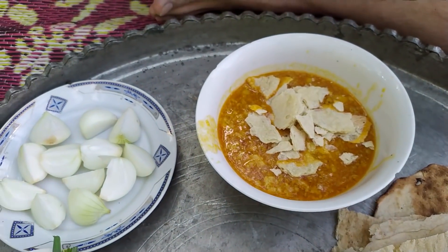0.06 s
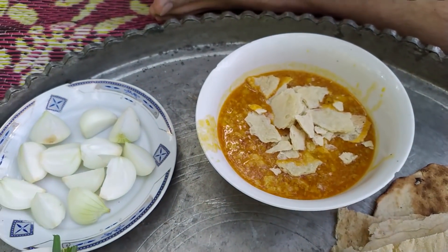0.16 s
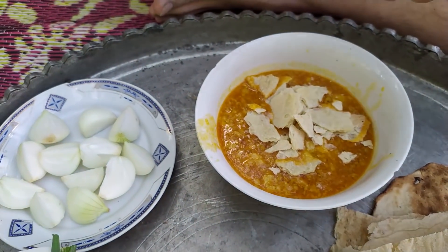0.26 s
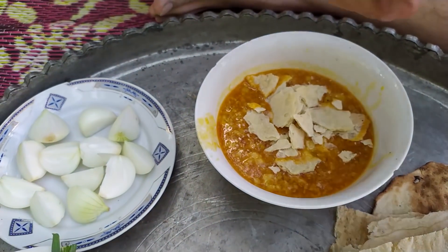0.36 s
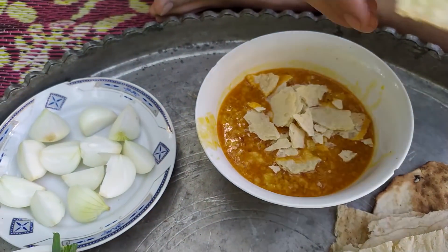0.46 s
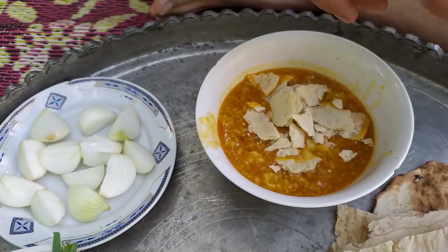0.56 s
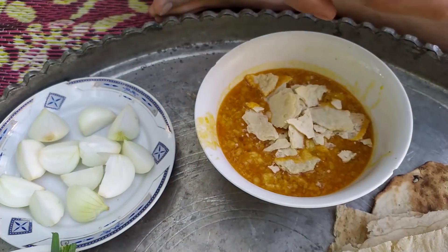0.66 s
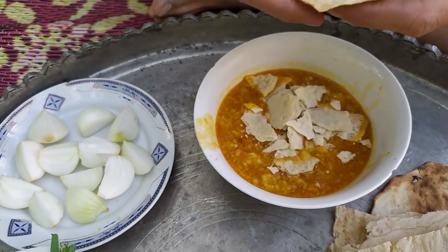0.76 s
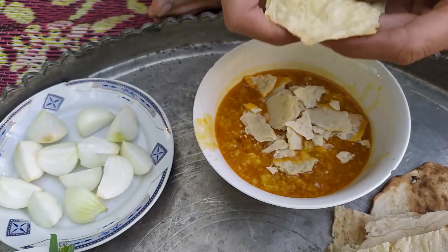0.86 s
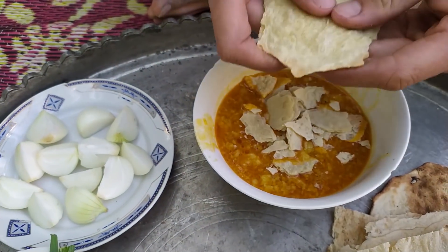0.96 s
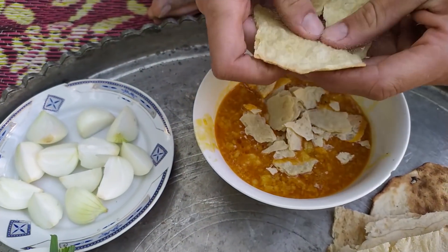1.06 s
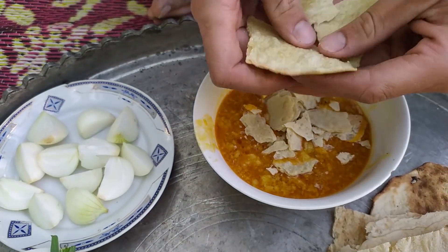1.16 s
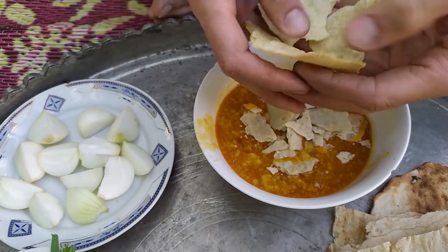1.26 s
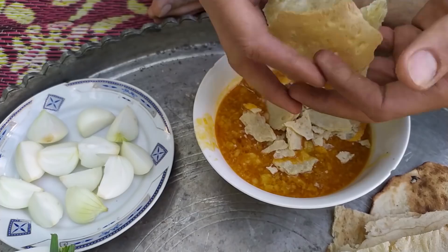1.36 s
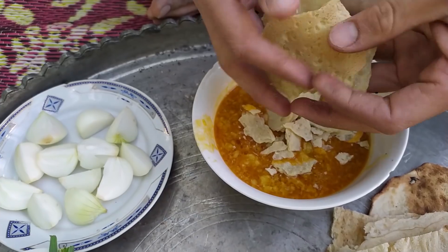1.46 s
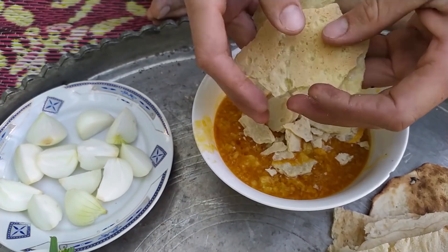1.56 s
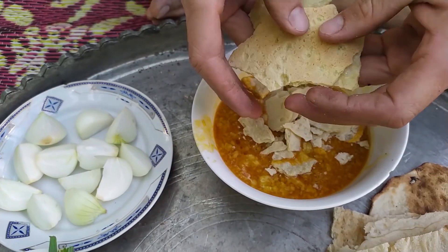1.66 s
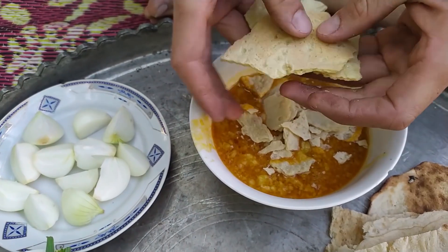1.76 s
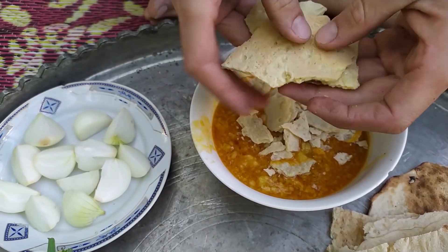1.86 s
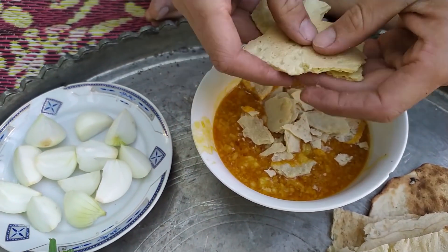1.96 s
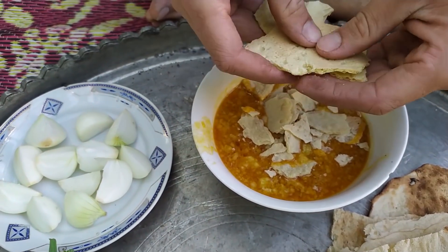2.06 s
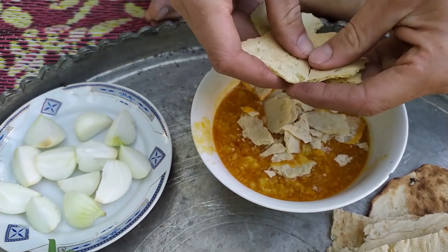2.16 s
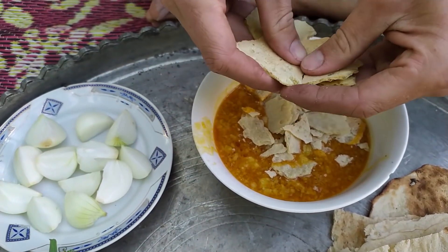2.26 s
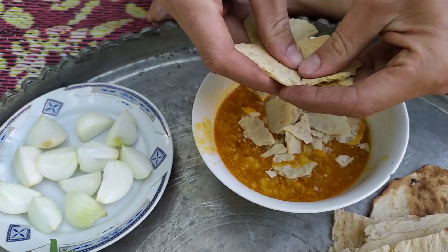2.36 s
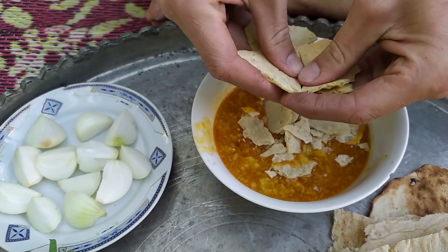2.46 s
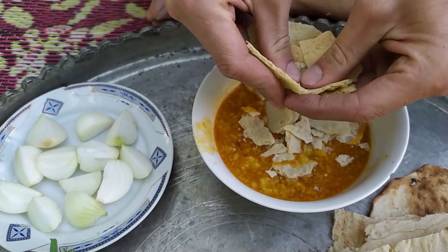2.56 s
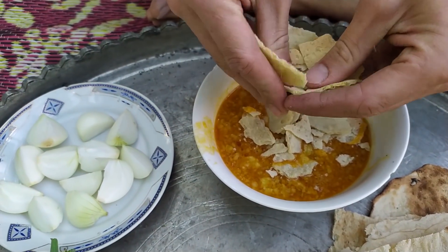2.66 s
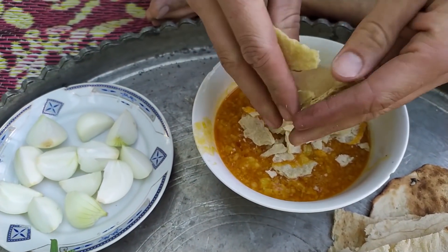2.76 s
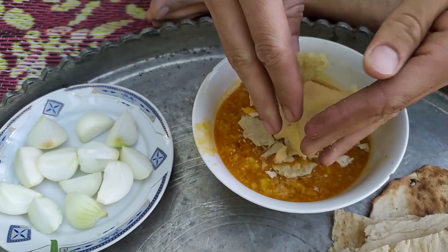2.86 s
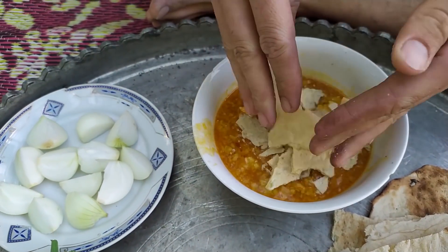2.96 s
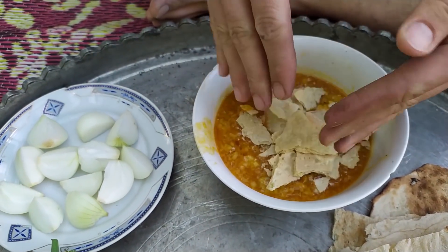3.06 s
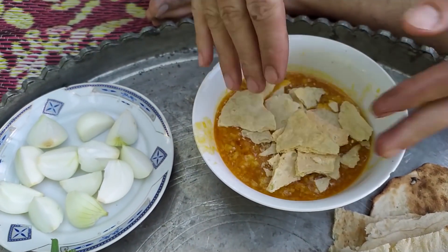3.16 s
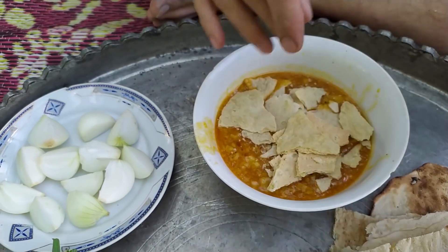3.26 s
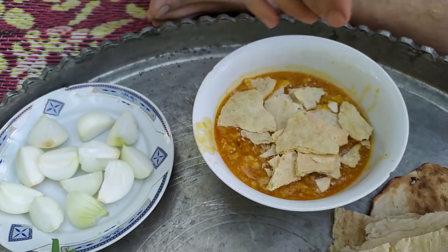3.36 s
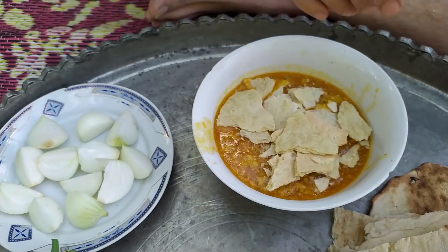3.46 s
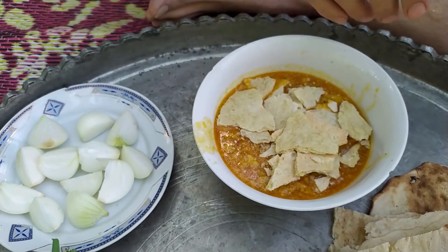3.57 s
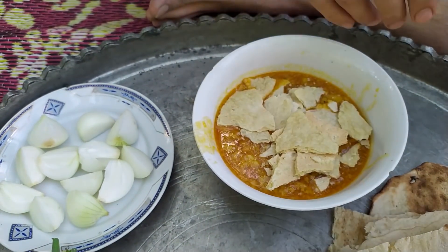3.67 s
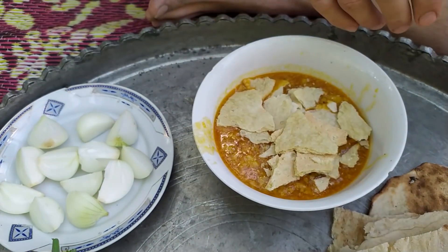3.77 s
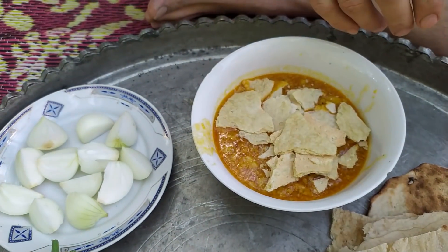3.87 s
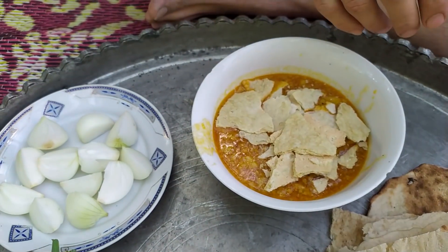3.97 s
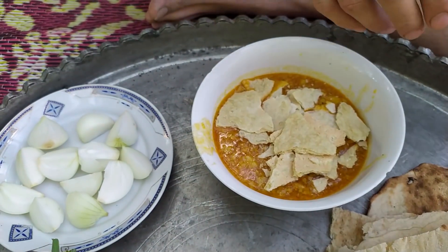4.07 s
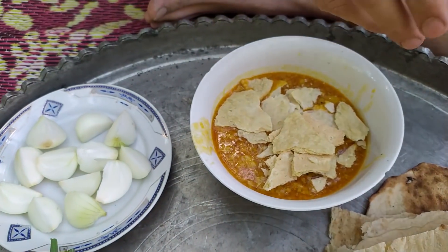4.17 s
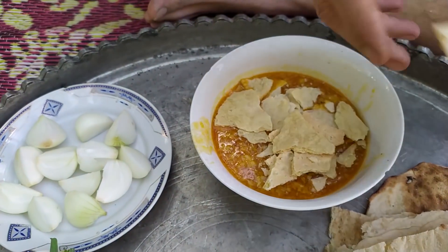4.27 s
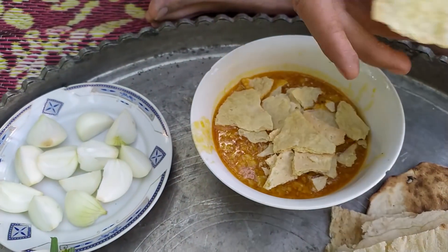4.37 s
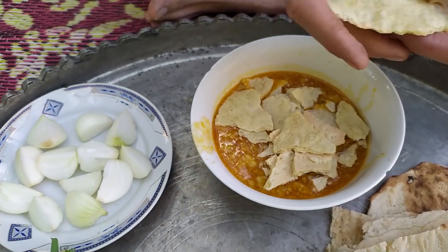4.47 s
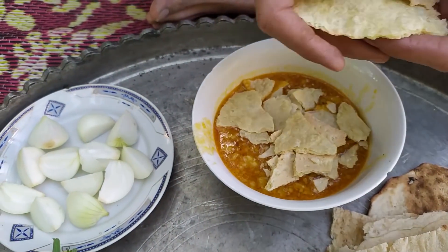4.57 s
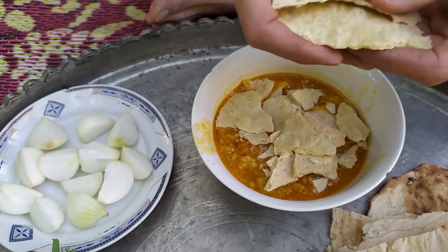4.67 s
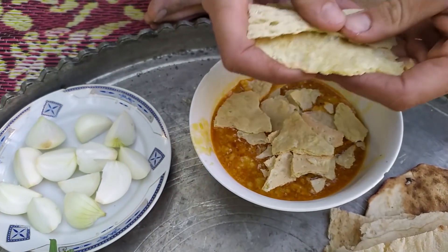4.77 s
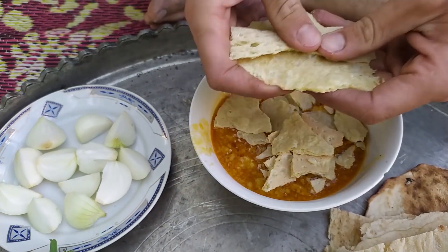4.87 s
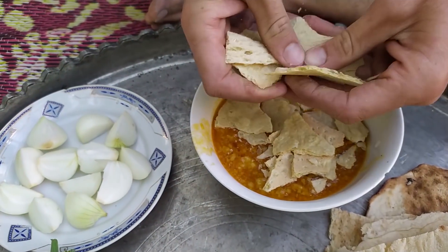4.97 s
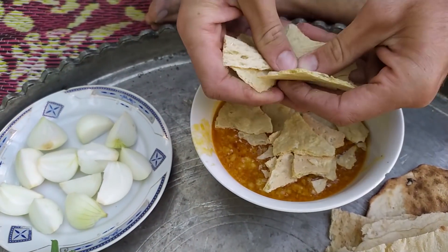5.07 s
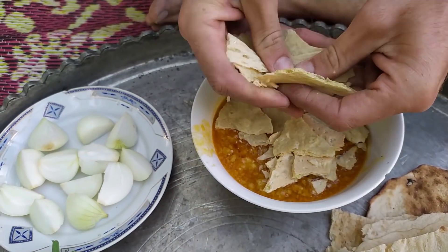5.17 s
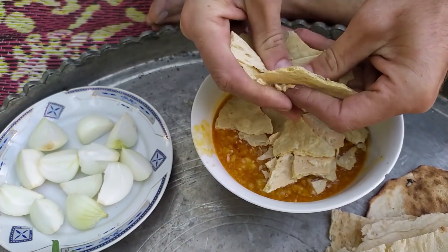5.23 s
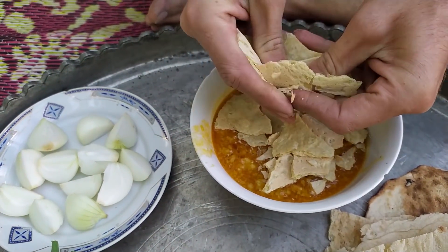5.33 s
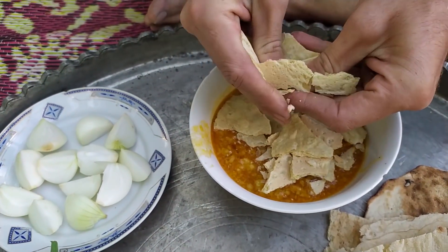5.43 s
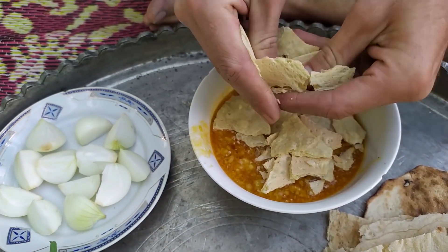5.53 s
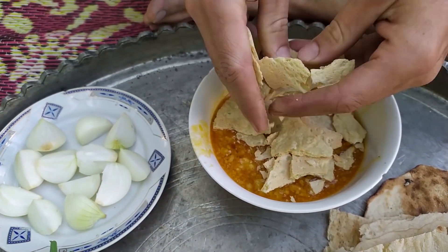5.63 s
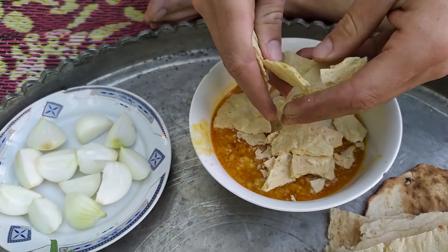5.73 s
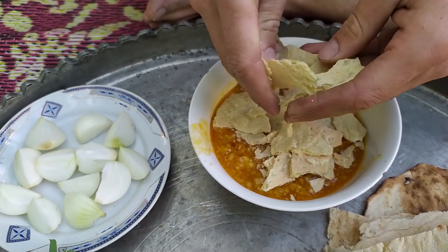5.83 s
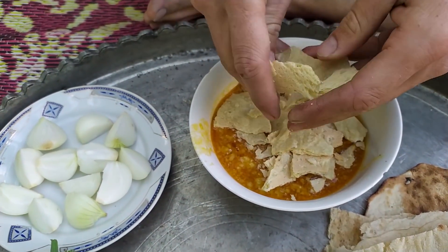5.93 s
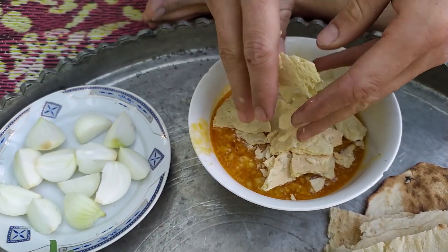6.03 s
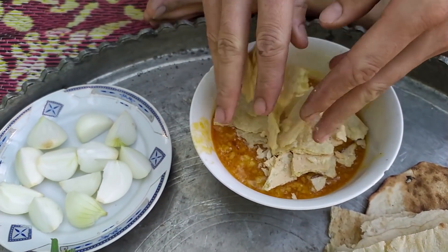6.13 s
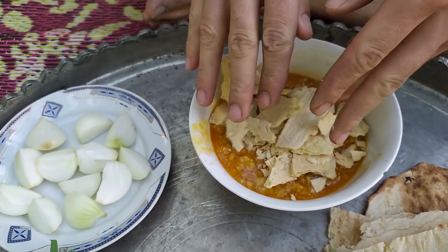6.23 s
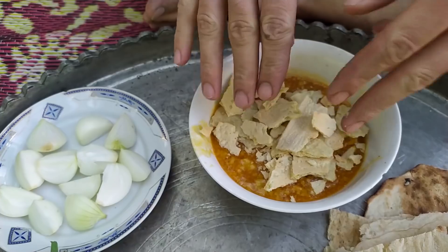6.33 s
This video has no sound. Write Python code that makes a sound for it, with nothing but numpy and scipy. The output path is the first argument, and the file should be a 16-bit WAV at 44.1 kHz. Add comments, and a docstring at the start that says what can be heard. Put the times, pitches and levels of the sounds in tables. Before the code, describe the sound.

Brittle flatbread cracks sharply between fingers, crumbs crackling, then pieces drop dully into a china bowl in a quiet room.

```python
"""Tearing dry flatbread into a bowl

Two hands fold and tear dry flatbread close by; the crust fails in snaps and running cracks, noise bursts that ring as flakes.
Running cracks shed crumbs; flakes crackle under the fingers and skin brushes, as grains of noise over a friction bed.
Pieces pat dully in one broad resonance, and touches ring the decaying modes of a filled china bowl.
The left microphone port stresses the treble, the loudest cracks saturate, and the quiet room adds a low rush and hiss."""
import sys
import numpy as np
from scipy import signal
from scipy.fft import rfft, irfft, next_fast_len
from scipy.io import wavfile
from scipy.ndimage import uniform_filter1d, map_coordinates

SR = 44100
rng = np.random.default_rng(int(sys.argv[2]) if len(sys.argv) > 2 else 0)


def generate_wav(sig):
    """Save sig (samples, or channels by samples) to the path in sys.argv[1] as 16-bit PCM at SR."""
    pcm = np.round(np.clip(np.atleast_2d(sig).T, -1, 1) * 32767).astype(np.int16)
    wavfile.write(sys.argv[1], SR, pcm)


N = 282240

# Cracks that run through the sheet. Each row: start in seconds, length of the run in seconds, level in dB,
# pitch of the flake in Hz, low flex of the sheet in dB re the level.
RUNNING_CRACKS = [(1.0793, 0.0026, -11.5, 4440, -11), (1.525, 0.01, -39, 4270, -8),
                  (1.545, 0.014, -36.5, 4330, -14.5), (1.603, 0.008, -30.5, 5930, -14.5),
                  (2.148, 0.0019, -18.5, 4500, -13.5), (2.155, 0.0033, -13.5, 4500, -22.5),
                  (2.2, 0.0053, -20, 5060, -22), (2.292, 0.0063, -24.5, 4340, -23),
                  (2.4115, 0.0066, -12, 5000, -23), (2.456, 0.0068, -20.5, 5200, -39),
                  (2.554, 0.027, -14, 5340, -23.5), (2.578, 0.011, -12.5, 4600, -20.5),
                  (4.772, 0.0071, -19, 5370, -18.5), (4.9883, 0.00047, -19.5, 4060, -7.5),
                  (5.001, 0.0086, -10, 5250, -16.5), (5.021, 0.0085, -15, 4230, -17),
                  (5.174, 0.0063, -25, 5300, -30), (5.197, 0.003, -23, 5170, -24),
                  (5.2095, 0.0044, -16, 5140, -26), (5.2547, 0.0055, -12.5, 4980, -20),
                  (5.271, 0.012, -16, 5500, -23), (5.58, 0.016, -33.5, 5450, -23),
                  (5.654, 0.011, -36.5, 5450, -14.5), (5.909, 0.0033, -12, 4700, -16.5),
                  (5.929, 0.018, -28, 5630, -33)]
LEVEL_WINDOW_S = 0.014  # the energy of a fracture's crisp part, spread over this long, gives its level


def amp(db):
    """Level law: decibels to an amplitude gain."""
    return 10 ** (np.asarray(db) / 20)


def unit(x):
    """Normalisation of mean power: scale to rms 1."""
    return x / np.sqrt(np.mean(x ** 2) + 1e-20)


def along(points, hz):
    """Logarithmic frequency scale: (Hz, value) points joined by straight lines on a log axis."""
    point_hz, values = np.transpose(points)
    return np.interp(np.log(hz + 1), np.log(point_hz), values)


def curve(rows):
    """Linear interpolation in time: (seconds, value) rows as one value per sample."""
    return np.interp(np.arange(N) / SR, *np.transpose(rows))


def colour(x, gain):
    """Minimum-phase filtering: folding the cepstrum makes a gain over frequency causal."""
    n = x.shape[-1]
    half = next_fast_len(n)
    hz = np.fft.rfftfreq(2 * half, 1 / SR)
    cepstrum = irfft(np.log(np.maximum(gain(hz), 1e-6)))
    cepstrum[1:half] *= 2
    cepstrum[half + 1:] = 0
    response = np.exp(rfft(cepstrum))
    return irfft(rfft(x, 2 * half) * response)[..., :n]


def shaped(x, spectrum):
    """Spectral shaping: x filtered by a table of Hz and dB, at rms 1."""
    return unit(colour(x, lambda hz: amp(along(spectrum, hz))))


def pair(x, apart):
    """Partial coherence: left and right mix a shared row with a row of their own."""
    own_share = np.clip(apart, 0, 1)
    return np.sqrt(1 - own_share) * x[0] + np.sqrt(own_share) * x[1:]


def add(track, s, sound):
    """Superposition: mix a sound into the track at a time in seconds."""
    part = track[:, max(0, round(s * SR)):][:, :sound.shape[-1]]
    part += sound[..., :part.shape[-1]]


def background():
    """Diffuse noise: a low rush nearly alike in both ports, and hiss independent in each port."""
    # Spectra of the rush and the hiss. Each row: frequency in Hz, relative density in dB per Hz.
    rush_spectrum = [(15, -85), (25, -46), (45, -11), (65, -5.5), (110, -2.5), (170, -1), (270, -3),
                     (400, -3), (650, -12), (1400, -31.5), (4000, -64)]
    hiss_spectrum = [(200, -19.5), (800, -4.5), (1500, -6), (2200, -4), (3000, -0.5), (5200, -2.5),
                     (7500, -2.5), (10000, -5.5), (13000, -14), (16000, -23)]
    rush = shaped(pair(rng.standard_normal((3, N)), apart=0.12), rush_spectrum)
    hiss = shaped(rng.standard_normal((2, N)), hiss_spectrum)
    return amp(-54) * rush + amp(-48.0) * hiss


def room(x):
    """Reverberation: convolution with noise whose decay time varies with frequency, shortest near 3 kHz."""
    # Decay of the room. Each row: frequency in Hz, time to fall by 60 dB in seconds.
    decay_times = [(200, 0.14), (3000, 0.1), (14000, 0.22)]
    hz, t, bins = signal.stft(rng.standard_normal((2, SR // 3)), SR, nperseg=256)
    decay = amp(-60 * t / along(decay_times, hz)[:, None])
    tail = signal.istft(bins * decay, SR, nperseg=256)[1]
    return signal.fftconvolve(x, tail / np.linalg.norm(tail[0]), axes=1)[:, :N]


def bowl():
    """Modal ringing: each light touch starts the damped modes of the filled china bowl."""
    # Light touches on the bowl. Each row: start in seconds, level in dB.
    touches = [(2.958, -57), (3.19, -52), (5.977, -43), (6.24, -45), (6.313, -44.5)]
    # Modes of the filled bowl. Each row: frequency in Hz, level in dB re the touch, 60 dB decay in seconds.
    modes = [(872, -8.5, 0.28), (1960, -1.5, 0.14), (3400, -3, 0.11), (5100, 17, 0.019)]
    out = np.zeros((2, N))
    t = np.arange(SR // 2) / SR
    for s, db in touches:
        ringing = np.zeros(len(t))
        for hz, level, t60 in modes:
            start_db = db + level + rng.normal(0, 3.1)  # each touch excites the modes unevenly
            ringing += amp(start_db - 60 * t / t60) * np.sin(2 * np.pi * hz * t)
        add(out, s, ringing)
    return out


def pats():
    """Resonance: soft contacts of loose pieces, as decaying noise, drive one broad, short resonance."""
    # Soft contacts. Each row: start in seconds, strength of the push in dB.
    contacts = [(1.206, -26), (1.334, -27), (1.455, -25), (2.801, -26), (2.93, -12.5), (2.939, -23),
                (2.955, -11), (3.005, -18), (3.034, -21)]
    resonance_hz, width_hz, fall_s = 1690, 260, 0.0044  # fall: time for the push to drop to 1/e
    t = np.arange(N) / SR
    push = sum(amp(db) * (t > s) * np.exp(-np.abs(t - s) / fall_s) for s, db in contacts)
    piece = lambda hz: 1 / np.hypot(1, (hz - resonance_hz ** 2 / (hz + 1)) / width_hz)
    return colour(push * pair(rng.standard_normal((3, N)), apart=0.19), piece)


def grains(rate, spread_db, life, bed_db, size=256):
    """Shot noise: decaying grains of uneven size at random moments, over a smooth friction noise."""
    happens = rng.random(N) < rate / SR  # rate in grains per second
    sizes = amp(spread_db * np.minimum(rng.exponential(size=N), 3)) * happens
    decay = np.exp(-2 * np.arange(size) / SR / life)  # of power; life is the 1/e time of amplitude
    power = signal.fftconvolve(sizes ** 2, decay)[:N]
    swell = np.sqrt(np.abs(power / power.mean()) + amp(bed_db) ** 2)  # bed in dB re the mean grains
    return swell * pair(rng.standard_normal((3, N)), apart=0.49)


def strokes(rows, attack_s, sag_db_per_s, release_s):
    """Friction envelope: the power of strokes that take hold, ease off while sliding, and let go."""
    power = np.zeros(N)
    for s, length, db in rows:
        t = np.maximum(np.arange(N) / SR - s, 0)
        held = amp(db - sag_db_per_s * np.minimum(t, length))
        attack = np.minimum(t / attack_s, 1)
        release = np.exp(-np.maximum(t - length, 0) / release_s)
        power += (held * attack * release) ** 2
    return power


def crumbs():
    """Exponential decay: the power of crumbs after each running crack, more from a longer run."""
    # level re the crack, for a run as long as the level window; time for the amplitude to drop to 1/e
    crumb_db, fall_s = -16, 0.018
    power = np.zeros(N)
    for s, run, db, _, _ in RUNNING_CRACKS:
        t = np.arange(N) / SR - s - run
        fall = amp(db + crumb_db) * np.exp(-np.abs(t) / fall_s)
        power += (t > 0) * run / LEVEL_WINDOW_S * fall ** 2
    return power


def catching():
    """Stick-slip: the uneven gain of fingers that catch and slip on the crust."""
    catches_per_s, catch_db = 90, 1.5
    knots = rng.standard_normal(N // 100)
    positions = np.arange(N) * catches_per_s / SR
    swing = map_coordinates(knots, [positions], mode="mirror")  # smooth curve through the knots
    return unit(amp(catch_db * swing))


def handling():
    """Granular friction: dry flakes crackle under fingers and after running cracks; skin brushes dully."""
    # Spectra of crackling flakes and of bare skin. Each row: frequency in Hz, relative density in dB per Hz.
    flake_spectrum = [(150, -19), (600, -15), (1100, -6), (1800, -3.5), (2400, 1), (3400, 4.5), (4700, 4),
                      (6800, 0.5), (9500, 1.5), (12500, -10.5), (16000, -16)]
    skin_spectrum = [(100, -10.5), (400, 0), (900, -0.5), (1600, -0.5), (3000, 4), (4500, -6), (7000, -4.5),
                     (11000, -10.5), (16000, -29)]
    # Fingers slide over the crust or press pieces into the bowl.
    # Each row: start in seconds, length in seconds, level in dB.
    rubs = [(1.21, 0.055, -44), (1.44, 0.024, -44.5), (1.645, 0.04, -45), (1.82, 0.017, -36),
            (1.945, 0.049, -37), (2.28, 0.037, -37), (2.48, 0.07, -40), (2.69, 0.24, -45),
            (2.808, 0.011, -37), (2.87, 0.016, -41), (2.93, 0.13, -37.5), (3.025, 0.035, -32),
            (3.08, 0.15, -50), (4.453, 0.025, -30), (4.475, 0.042, -36.5), (4.83, 0.09, -47.5),
            (5.34, 0.12, -42.5), (5.67, 0.23, -45.5), (6.02, 0.17, -44.5), (6.18, 0.19, -41),
            (6.238, 0.037, -29.5)]
    # Bare skin brushes about. Each row: start in seconds, length in seconds, level in dB.
    brushes = [(-0.005, 0.024, -32.5), (0.055, 0.035, -36), (0.11, 0.018, -32.5), (0.15, 0.06, -50),
               (0.3, 0.0073, -46), (1.31, 0.11, -50), (3.8, 0.03, -44.5), (3.828, 0.051, -40.5),
               (3.88, 0.028, -38.5), (3.96, 0.021, -44.5)]
    flakes = shaped(grains(rate=980, spread_db=5.0, life=0.0015, bed_db=-4), flake_spectrum)
    skin = shaped(grains(rate=750, spread_db=3, life=.0008, bed_db=0), skin_spectrum)
    rub_power = strokes(rubs, attack_s=0.0045, sag_db_per_s=7, release_s=0.016)
    rubbing = np.sqrt(rub_power + crumbs())
    brushing = np.sqrt(strokes(brushes, attack_s=0.0032, sag_db_per_s=13, release_s=0.021))
    return rubbing * catching() * flakes + brushing * skin


def ticks():
    """Random microfracture: faint snaps of the bent sheet, as rows of start s, level dB, pitch Hz."""
    # Stretches of hard bending, each giving at least one tick. Each row: start in seconds, end in seconds;
    # an end ahead of its start leaves a single tick near the start.
    bends = [(1.93, 2.37), (2.381, 2.69), (2.92, 3.06), (5.171, 5.47), (6.221, 4.8)]
    ticks_per_s, tick_db, spread_db = 24, -33.5, 1.5
    tick_hz, spread_octaves = 4740, 0.3
    moments = []
    for start, end in bends:
        count = max(1, round((end - start) * ticks_per_s))
        moments.extend(np.linspace(start, end, count, endpoint=False))
    delay, size, pitch = rng.standard_normal((len(moments), 3)).T
    starts = np.array(moments) + np.abs(delay) * .5 / ticks_per_s
    return zip(starts, tick_db + spread_db * size, tick_hz * 2 ** (spread_octaves * pitch))


def fracture(run, pitch_hz, flex_db, release=0.00072, ring_db=11, sharpness=6, scatter_db=-5.5,
             scatter_life=0.0031, size=2048):
    """Brittle fracture: stress lets go in a burst, the flake rings, the sheet flexes, hands and bowl scatter."""
    # Spectra of the crisp crust and of the flexing sheet. Each row: frequency in Hz, relative level in dB.
    crust_spectrum = [(500, -45), (1200, -11.5), (2000, -13), (3200, -0.5), (5000, -4), (6800, -4.5),
                      (9000, 1.5), (11000, -0.5), (13000, -7), (16000, -13.5)]
    flex_spectrum = [(30, -21), (100, -9), (250, -7.5), (550, -10.5), (800, -1), (1250, 2.5), (1700, 4),
                     (2200, -0.5), (4000, -54.5)]
    t = np.arange(size) / SR
    # a running crack stalls and jumps from blister to blister
    jumps = amp(2.9 * unit(uniform_filter1d(rng.standard_normal(size), 50)))
    rise = 1 - np.exp(-(t / .0003) ** 2)
    fall = np.exp(-np.maximum(t - run, 0) / release)
    burst = rise * fall * jumps * rng.standard_normal(size)
    # scattered paths, their total energy in dB re the direct sound
    paths = rng.standard_normal((2, size)) * np.exp(-t / scatter_life) * (t > .0006)
    paths *= amp(scatter_db) / np.linalg.norm(paths, axis=1, keepdims=True)
    # the direct sound reaches the left port a few samples late, by an amount drawn at random for each burst
    paths[0, rng.integers(1, 7)] = 1
    paths[1, 0] = 1
    heard = signal.fftconvolve(burst[None], paths, axes=1)[:, :size]
    detuning = lambda hz: hz / pitch_hz - pitch_hz / (hz + 1)
    ring = lambda hz: 1 + amp(ring_db) / np.hypot(1, sharpness * detuning(hz))
    crisp = unit(colour(heard, lambda hz: amp(along(crust_spectrum, hz)) * ring(hz)))
    flex = amp(flex_db) * shaped(heard, flex_spectrum)
    return (crisp + flex) * np.sqrt(LEVEL_WINDOW_S * SR / size)


def cracks():
    """Crack growth: running cracks, snaps and faint ticks, each after a faint lead-in burst."""
    # Clear single fractures of the crust. Each row: start in seconds, level in dB, pitch of the flake in Hz.
    single_snaps = [(1.023, -36, 4230), (1.0284, -33.5, 4600), (1.0567, -31, 5240), (1.622, -30.5, 5200),
                    (1.7155, -30.5, 3080), (1.7366, -30.5, 4370), (1.8386, -34, 3870), (1.8677, -25, 6960),
                    (1.9698, -30, 4300), (2.0312, -30.5, 4560), (2.039, -27, 4430), (2.0921, -27.5, 4600),
                    (2.1006, -28.5, 4800), (2.1216, -24.5, 4500), (2.1342, -23.5, 3300),
                    (2.1788, -29, 4600), (2.2694, -24, 4450), (2.3077, -30, 4300), (2.3759, -29, 4600),
                    (2.4097, -25, 5200), (2.4836, -23, 7200), (2.545, -23.5, 5070), (2.6213, -43, 4600),
                    (2.6779, -30, 4600), (2.9576, -33, 3560), (2.9683, -30, 3650), (3.0647, -33, 4460),
                    (4.462, -30.5, 4560), (4.7607, -39, 4300), (4.799, -14, 7980), (4.827, -21.5, 7700),
                    (4.8889, -37.5, 5600), (4.9755, -22, 2960), (5.0681, -25, 4600), (5.1255, -23.5, 5190),
                    (5.15, -20.5, 5240), (5.1541, -25.5, 7500), (5.2049, -25, 4900), (5.2216, -22.5, 5680),
                    (5.246, -21.5, 5560), (5.2967, -27, 5330), (5.3027, -30, 5300), (5.325, -26.5, 6870),
                    (5.341, -22, 4840), (5.3467, -18, 5200), (5.3745, -29, 6100), (5.3928, -16.5, 6900),
                    (5.4141, -30, 4830), (5.466, -28.5, 5210), (5.514, -33.5, 7900), (5.5398, -26.5, 6300),
                    (5.5718, -28, 5100), (5.8517, -24, 5440), (5.8598, -30, 4800), (5.9774, -25, 5400),
                    (6.212, -33.5, 4696), (6.2401, -32, 4460), (6.3137, -35, 4450), (6.3635, -43, 4600)]
    snap_run_s, snap_flex_db = 0.00018, -23  # a snap hardly runs, and flexes the sheet only a little
    lead_s, lead_db = 0.0023, -27.5  # a much weaker noise burst begins this early, at this level re the break
    snaps = [(s, snap_run_s, db, pitch_hz, snap_flex_db) for s, db, pitch_hz in [*single_snaps, *ticks()]]
    out = np.zeros((2, N))
    for s, run, db, pitch_hz, flex_db in [*RUNNING_CRACKS, *snaps]:
        add(out, s - lead_s, amp(db + lead_db) * fracture(lead_s, pitch_hz, snap_flex_db))
        add(out, s, amp(db) * fracture(run, pitch_hz, flex_db))
    return out


def scene():
    """Superposition of direct, reverberant and background sound, with a left-right balance for the hands."""
    # Balance as the hands move between the ports. Each row: time in seconds, left minus right in dB.
    lean = [(1.0, -0.5), (2.55, 1.1), (2.75, 3), (3.1, 2.2), (3.8, -1.5), (4.8, -1), (5.35, 1), (5.55, 3),
            (5.97, 1.5), (6.4, 4)]
    balance = amp(curve(lean) * np.array([[.5], [-.5]]))
    near = (cracks() + handling() + pats() + bowl()) * balance
    return near + amp(-18.0) * room(near) + background()


def record(dry, ceiling=0.76):
    """Transduction: the ports colour each side, loud cracks saturate, and the band is limited."""
    # Pickup of the left port over the right. Each row: frequency in Hz, level difference in dB.
    port_difference = [(100, 0), (700, 0), (1300, 0), (2400, 7), (3300, 13), (4600, 14.5), (8000, 5.5),
                       (11000, 3.5), (15000, -6)]
    top_hz = 15900
    left = colour(dry[0], lambda hz: amp(along(port_difference, hz) / 2))
    right = colour(dry[1], lambda hz: amp(-along(port_difference, hz) / 2))
    x = np.array([left, right])
    x = x / (1 + np.abs(x / ceiling) ** 4) ** (1 / 4)  # soft saturation
    x = signal.sosfilt(signal.butter(2, 30, "highpass", fs=SR, output="sos"), x)
    return irfft(rfft(x) * (np.fft.rfftfreq(N, 1 / SR) < top_hz), N)


dry = scene()
out = record(dry)
generate_wav(out)
```